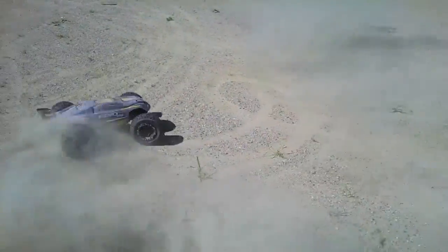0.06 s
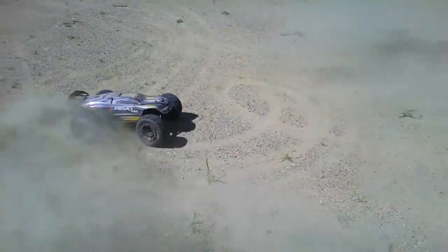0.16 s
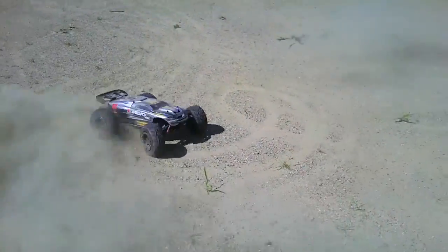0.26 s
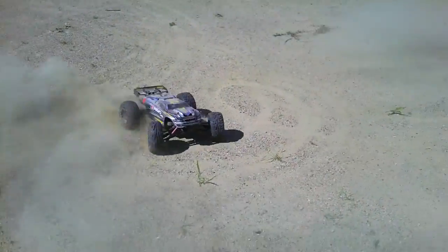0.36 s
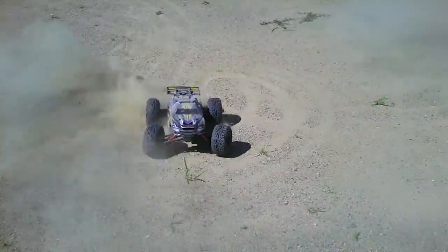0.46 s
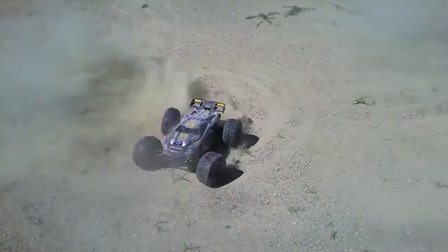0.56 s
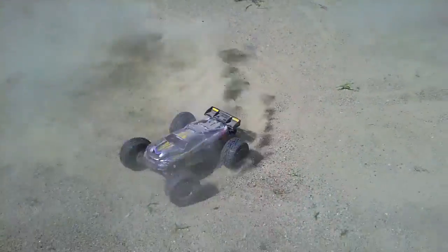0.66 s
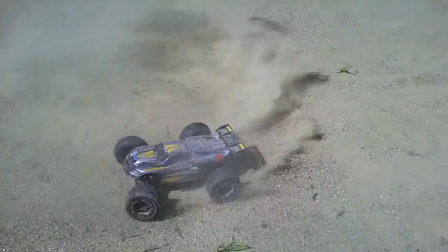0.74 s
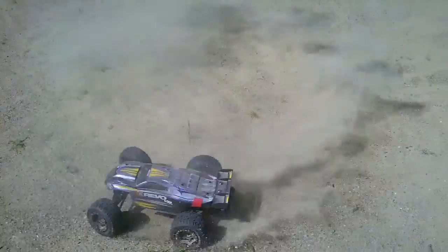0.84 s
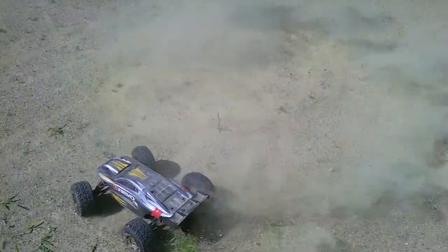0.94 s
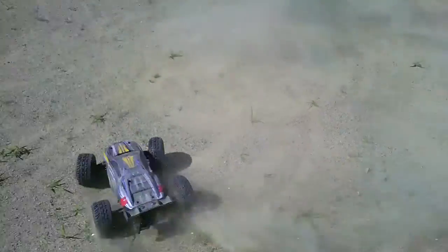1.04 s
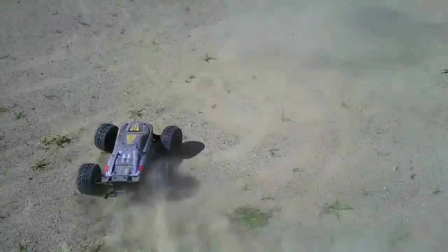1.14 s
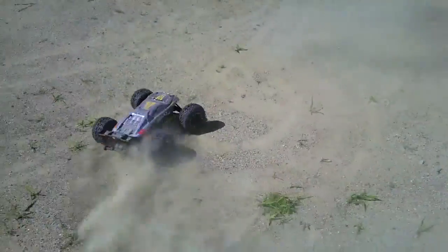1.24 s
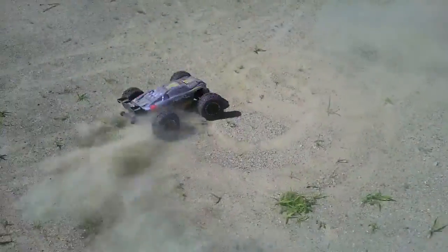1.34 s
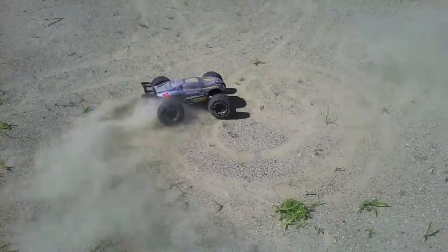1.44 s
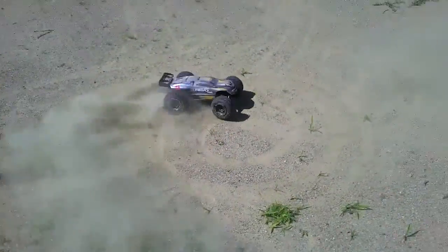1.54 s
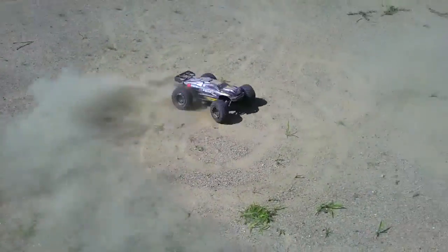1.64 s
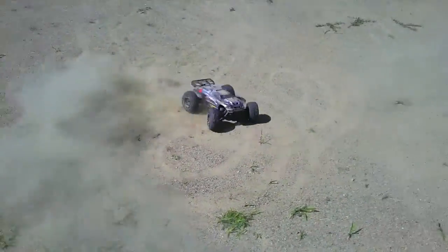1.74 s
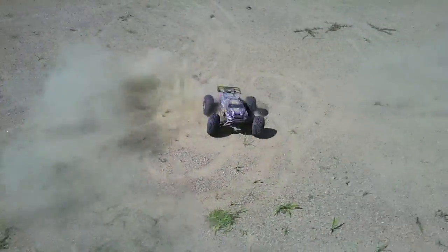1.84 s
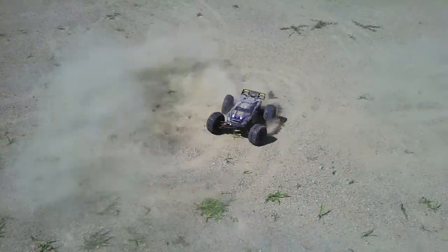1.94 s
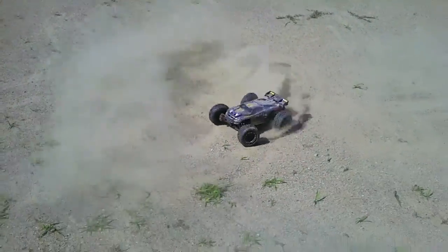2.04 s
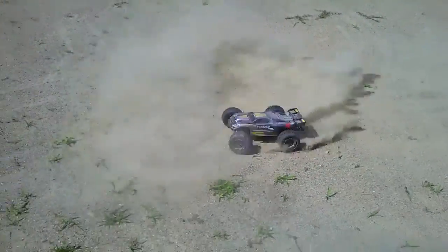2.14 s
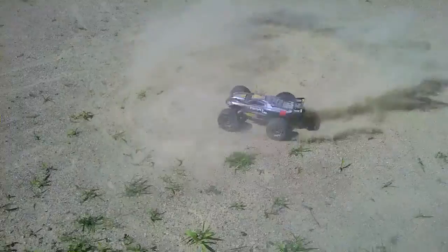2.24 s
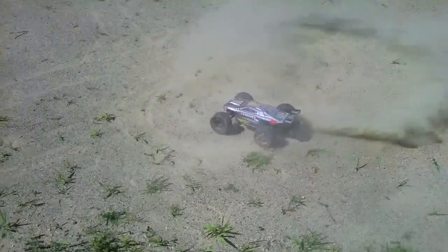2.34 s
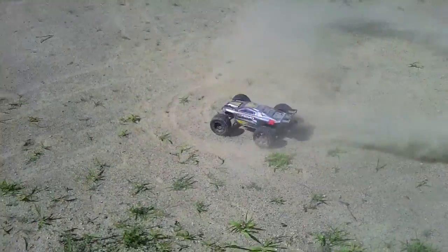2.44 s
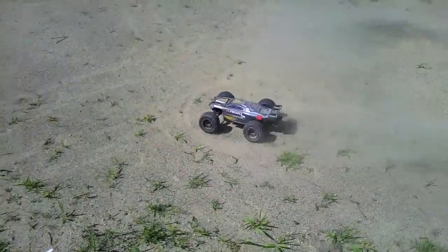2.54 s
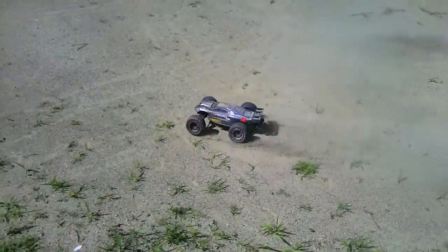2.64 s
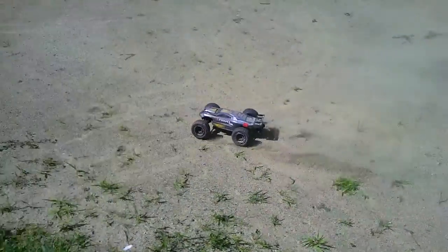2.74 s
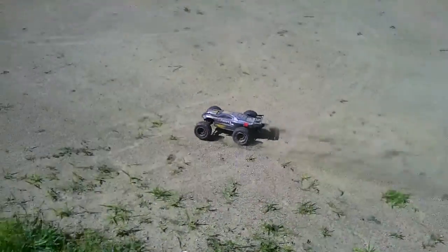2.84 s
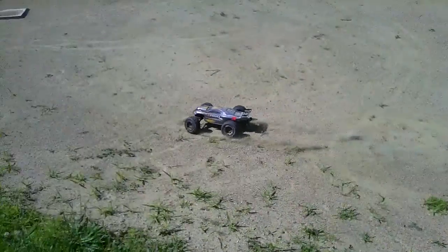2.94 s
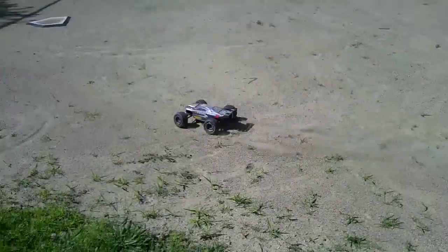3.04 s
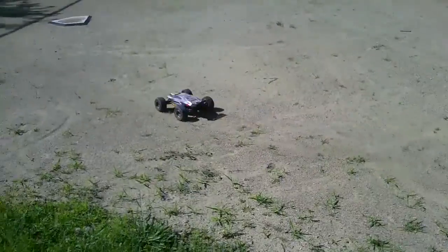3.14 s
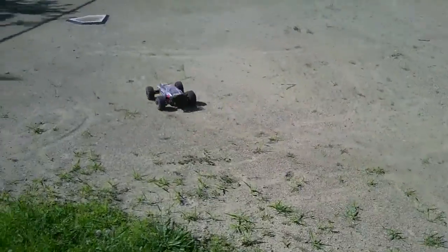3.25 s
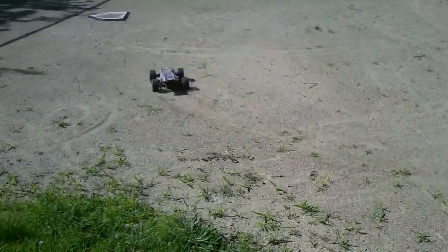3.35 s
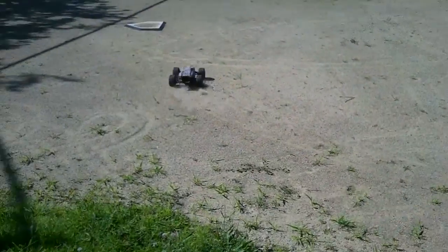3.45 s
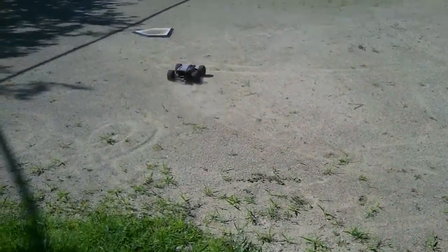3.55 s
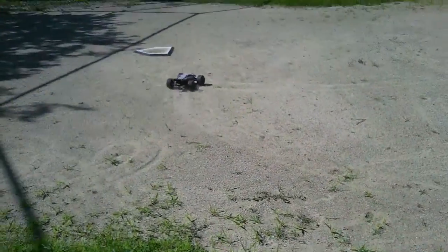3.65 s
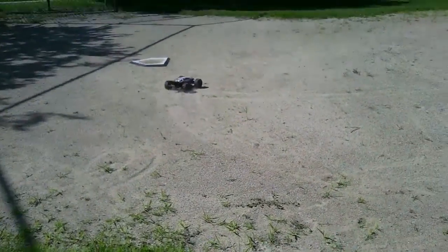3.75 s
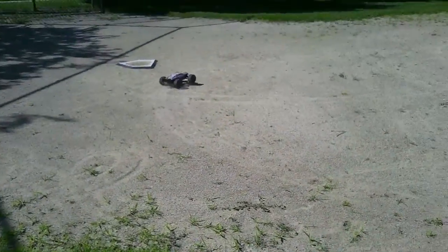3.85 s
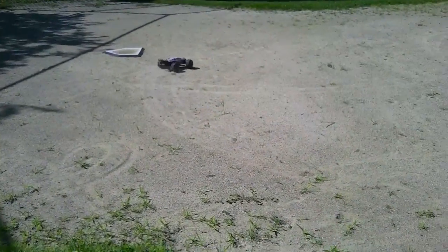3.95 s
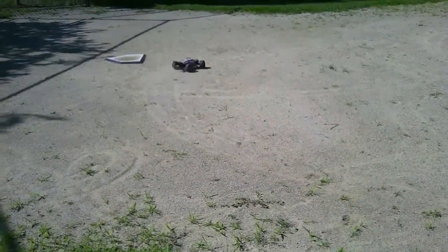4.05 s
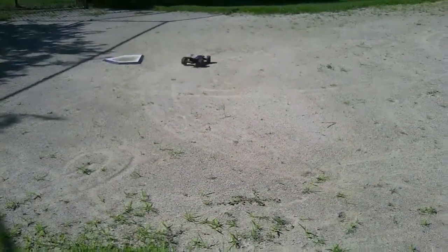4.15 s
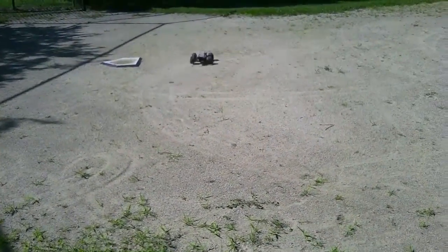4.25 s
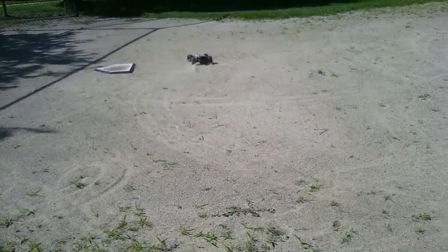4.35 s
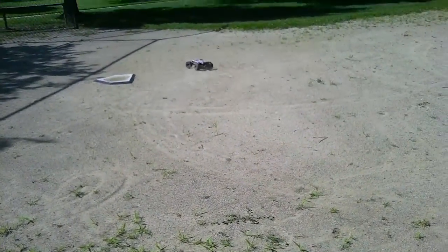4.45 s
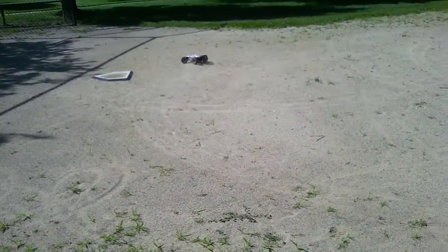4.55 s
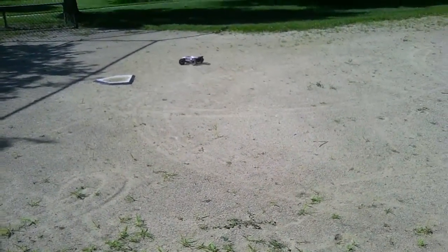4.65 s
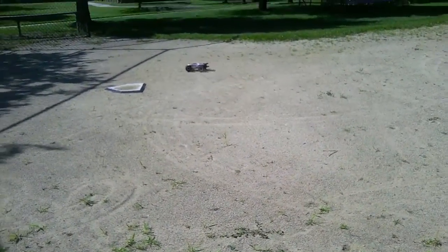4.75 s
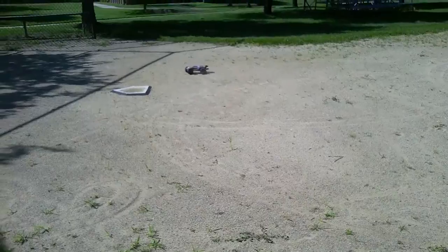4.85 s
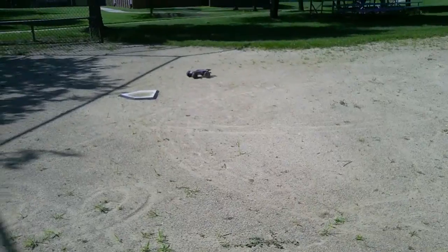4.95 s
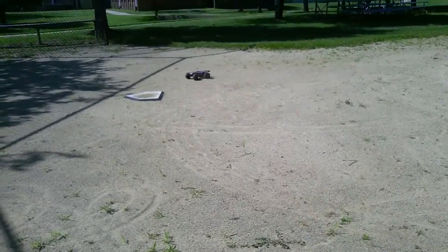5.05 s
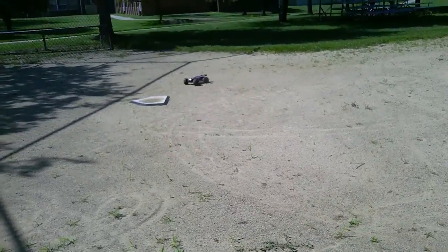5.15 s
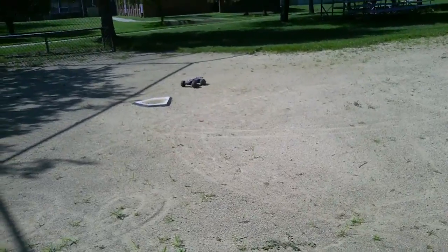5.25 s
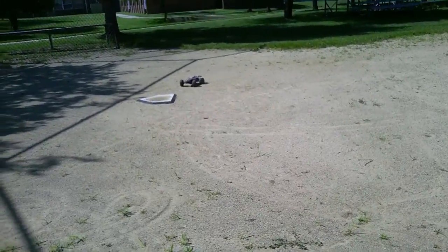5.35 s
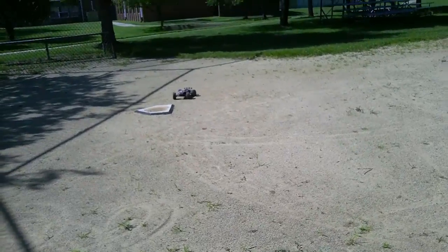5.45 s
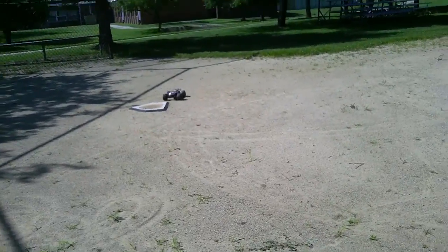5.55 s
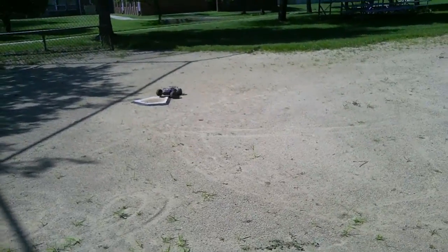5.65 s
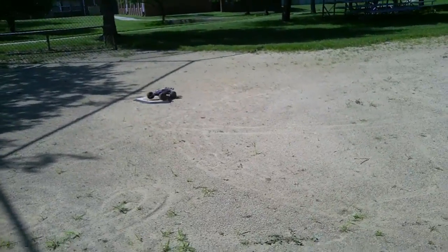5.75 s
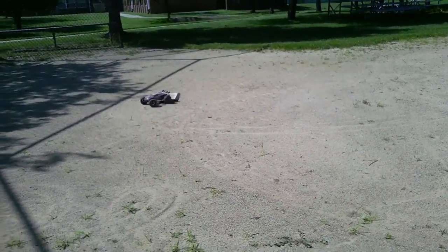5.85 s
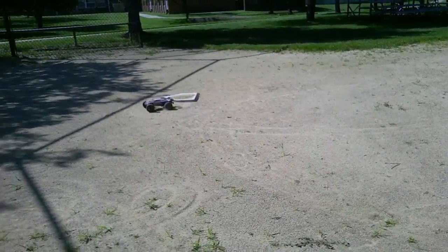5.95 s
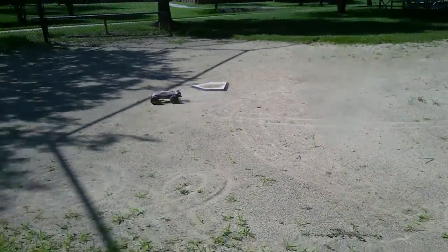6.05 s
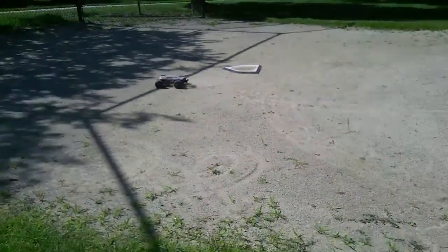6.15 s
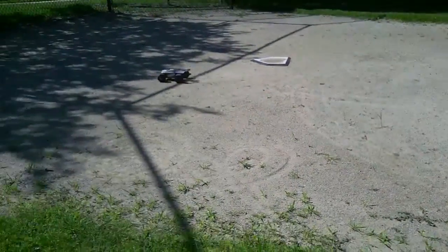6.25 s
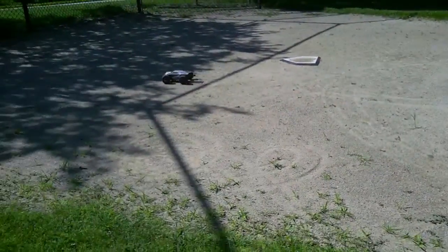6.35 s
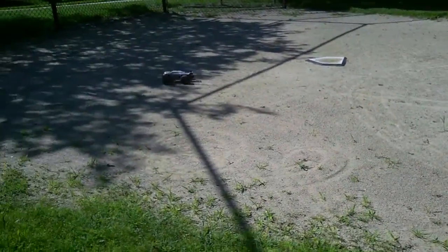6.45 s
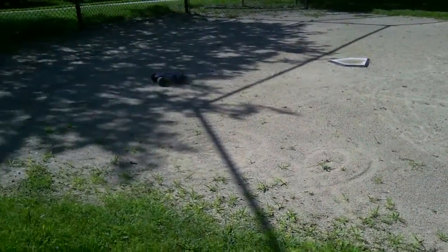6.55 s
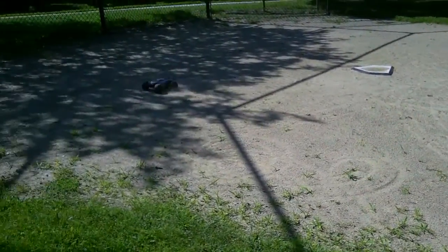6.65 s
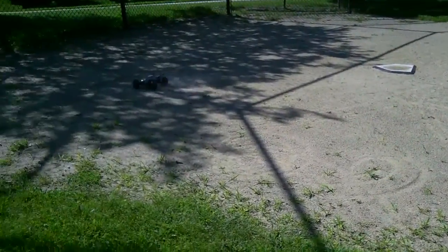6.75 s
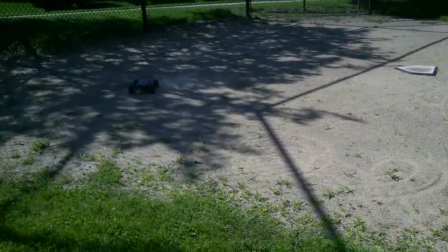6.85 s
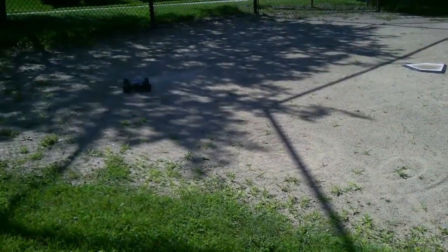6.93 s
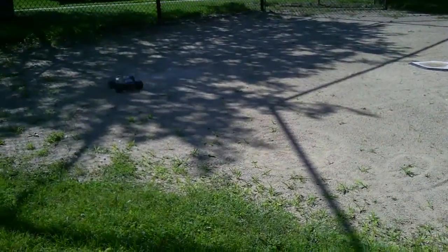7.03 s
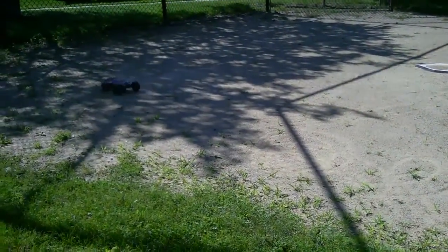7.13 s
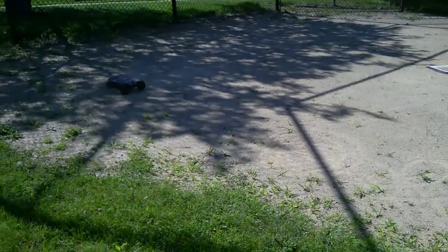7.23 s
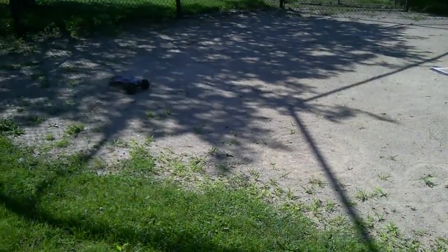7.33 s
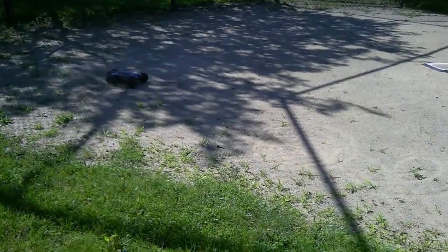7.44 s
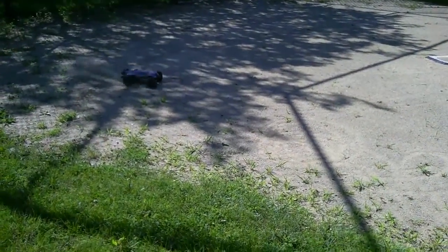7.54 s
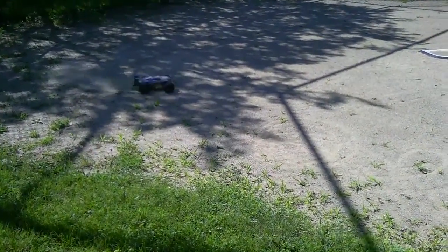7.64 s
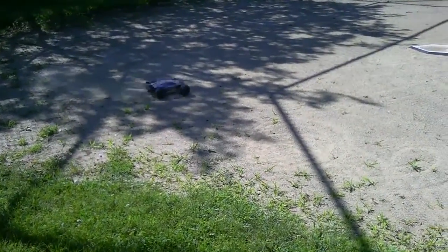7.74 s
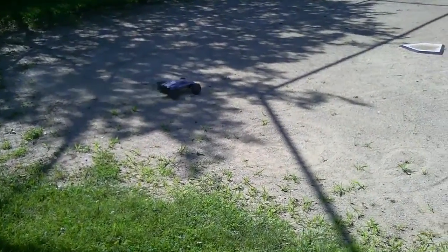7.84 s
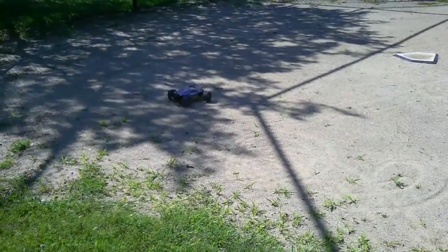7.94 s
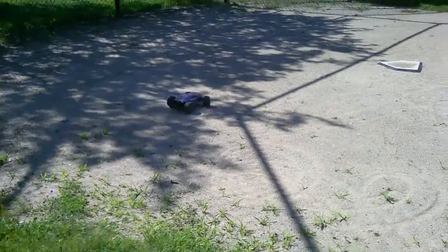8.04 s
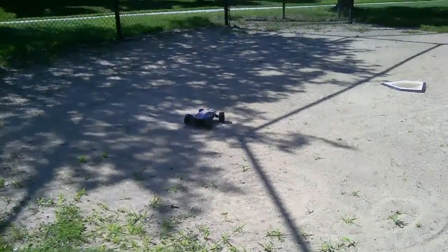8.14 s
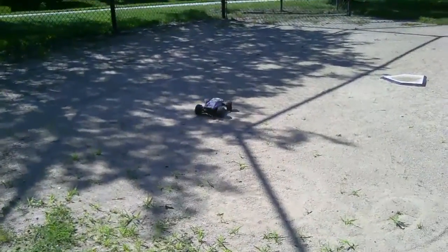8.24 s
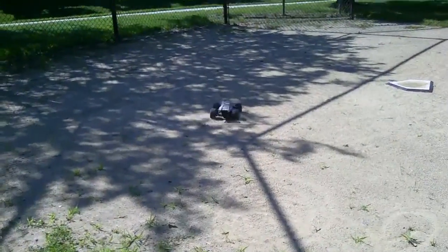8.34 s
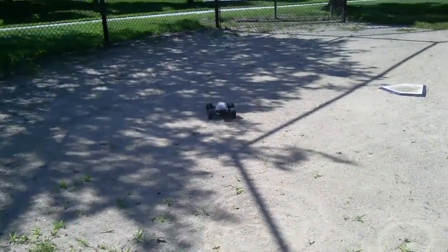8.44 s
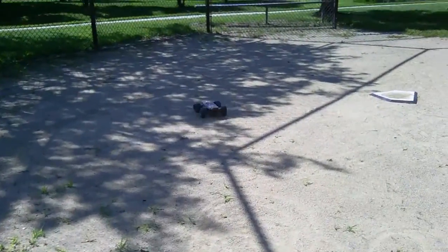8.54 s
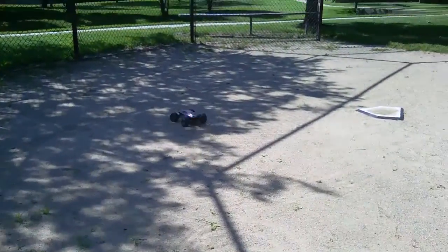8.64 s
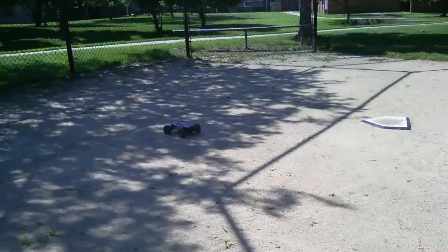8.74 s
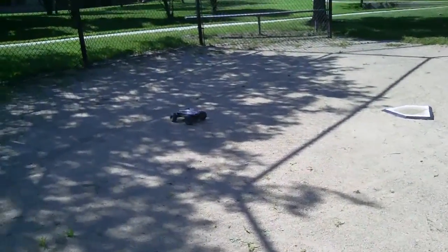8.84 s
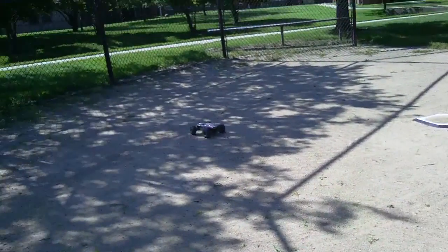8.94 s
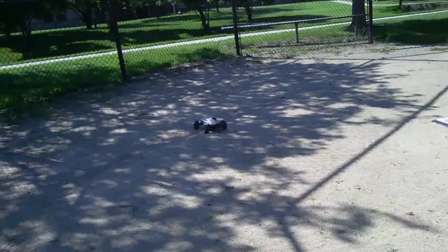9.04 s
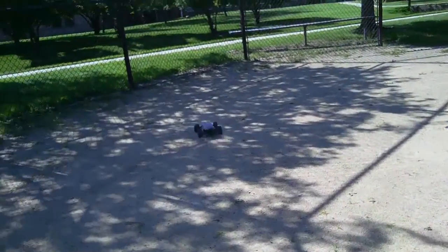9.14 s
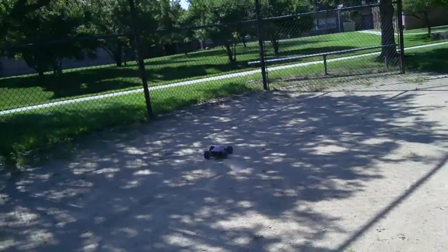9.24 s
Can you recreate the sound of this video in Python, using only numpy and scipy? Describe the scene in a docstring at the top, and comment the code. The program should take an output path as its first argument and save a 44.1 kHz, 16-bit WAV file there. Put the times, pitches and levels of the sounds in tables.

```python
"""A small electric radio-controlled truck spins doughnuts on a dirt ballfield, then drives off in throttle bursts.
Its gears are tones at multiples of a tooth rate, bent by every wheel turn and coloured by the housing.
Tyres are three bands of grainy noise; the speed controller sings a fixed pitch at part throttle.
Squeals glide, stones crack, the chassis knocks, and a breeze touches the single microphone."""
import sys
import numpy as np
from scipy import signal
from scipy.fft import rfft, irfft, next_fast_len
from scipy.io import wavfile
from scipy.ndimage import uniform_filter1d, minimum_filter1d, map_coordinates

SR = 44100
rng = np.random.default_rng(int(sys.argv[2]) if len(sys.argv) > 2 else 0)


def dump(signal):
    """Clip the signal to [-1, 1] and save it as 16-bit WAV at the path in sys.argv[1]."""
    limited = np.clip(np.atleast_2d(signal).T, -1, 1)
    pcm = np.round(limited * 32767).astype(np.int16)
    wavfile.write(sys.argv[1], SR, pcm)


N = 409688
TIME = np.arange(N) / SR
RELEASE_DB_PER_S = 115  # how fast dirt noise and whine die after a burst
SPIN_END_S, SPIN_STOP_DB_PER_S = 2.15, 196  # throttle off; how fast the doughnut dies

# drivetrain tones, strongest under full power: [multiple of tooth rate, level/dB against crunch, roughness]
# roughness runs 0-1 and is clipped there
STRAIN_TONES = [(.432, -11, 0.42), (0.851, -22.5, 0.06), (1.239, -10.5, 1.1), (1.46, -16.5, 1.1),
                (2.77, -6, 0.65)]
# overtones that follow the octave: [multiple of tooth rate, relative level/dB, roughness]
OVERTONES = [(1.459, -10, .4), (2, -0.5, 0.04), (3.002, -8, 0.3), (3.999, -4, 0.86)]
SPIN_STRAIN_DB, DRIVE_STRAIN_DB = 0, -13  # strain tones in the doughnuts and when driving


def gears(tooth_hz, wheel, crunch_db):
    """The drivetrain whines; its pitch bends and its tones chatter as the wheels grip and slip."""
    slip = 0.0268 * np.sin(wheel) + 0.012 * wobble(70)
    # below full speed the tyres bite and let go, which jerks the motor harder
    snatch = np.clip((2450 - tooth_hz) / 300, 0, 1) * 0.036 * wobble(85)
    phase = angle(tooth_hz * (1 + slip + snatch))

    tone_db, octave_db = whine_levels()
    tone_gain = amp(tone_db - 1.0 + 2.74 * wobble(60))
    tone = tone_gain * mesh_tone(phase, rough=0.3, width_hz=260)
    overtones = sum(amp(db) * mesh_tone(k * phase, rough, width_hz=300 * k)
                    for k, db, rough in OVERTONES)
    whine = tone + amp(octave_db - 3.3 + 2.9 * wobble(70)) * overtones

    # full power brings out the slower and faster gear stages too
    power_db = np.maximum(SPIN_STRAIN_DB - SPIN_STOP_DB_PER_S * since(SPIN_END_S), DRIVE_STRAIN_DB)
    strain = sum(amp(db + 1.5 * wobble(29.6)) * mesh_tone(k * phase, rough, width_hz=110 + 200 * k)
                 for k, db, rough in STRAIN_TONES)
    return filtered(whine + amp(crunch_db + power_db) * strain, housing)


# gears in the doughnuts at full throttle: [t/s, tooth rate f/Hz]
SPIN_SPEED = [(0, 2372), (.25, 2368), (.54, 2433), (.63, 2567), (.88, 2543), (1.02, 2625), (1.3, 2480),
              (1.88, 2514), (2.13, 2585)]
# throttle bursts, also played by whine_levels and dirt_levels:
# [full throttle t/s, rise t/s, hold t/s, top tooth rate f/Hz, acceleration Hz/s,
#  spray level/dB, crunch level/dB, tread level/dB, tooth tone relative level/dB, octave relative level/dB]
BURSTS = [(2.289, 0.15, .06, 2403, 3010, -49, -34, -35.5, -46, -54),
          (2.655, 0.21, .245, 2540, 6014, -26, -29.5, -31.5, -42, -35),
          (3.28, .22, 0.056, 2064, 3997, -32, -35.5, -36.5, -53, -37.5),
          (3.789, 0.093, 0.061, 1697, 3000, -36.5, -40, -40.5, -49, -43.5),
          (4.235, .16, 0.08, 2002, 4520, -37, -38.5, -41.5, -55, -45),
          (4.973, 0.072, 0.075, 2167, 2480, -43.5, -48.5, -46, -56, -49),
          (5.41, 0.16, 0.096, 2105, 3000, -44.5, -46, -49.5, -56, -68),
          (5.77, 0.36, 0.031, 2167, 2590, -38, -40, -59, -52, -47),
          (5.926, 0.2, .09, 2143, 5520, -41, -38.5, -39, -50.5, -40),
          (6.348, 0.078, .1, 1744, 3000, -51, -42, -44.5, -51, -44.5),
          (6.549, .2, .14, 2197, 3500, -37.5, -41, -43, -50, -43),
          (7.369, 0.41, .12, 2230, 2376, -35.5, -38.5, -39.5, -51.5, -42.5),
          (8.03, 0.24, 0.13, 2160, 2610, -44.5, -43.5, -54, -50, -52),
          (8.528, .1, 0.099, 2130, 3005, -41, -44, -45.5, -54, -66),
          (9.078, 0.21, 0.082, 2082, 2500, -35.5, -38.5, -39.5, -57, -48)]
COAST_HZ_PER_S, CRAWL_HZ = 4400, 1305  # slowing off the throttle; slowest tooth rate


def motor_speed():
    """Tooth rate: each burst pulls the motor up to its top speed, then it coasts down."""
    hz = curves(SPIN_SPEED)[0] - COAST_HZ_PER_S * since(SPIN_END_S)
    for s, _, hold, top_hz, acceleration, *_ in BURSTS:
        pull_hz = top_hz - acceleration * until(s) - COAST_HZ_PER_S * since(s + hold)
        hz = np.maximum(hz, pull_hz)
    return np.maximum(hz, CRAWL_HZ)


# the whine flares as the circling truck swings its gearbox to the microphone:
# [t/s, half length t/s, tooth tone relative level/dB, octave relative level/dB]
FLARES = [(0.016, 0.051, -50, -27), (.2, .1, -36, -38), (0.43, 0.18, -38, -22), (0.682, 0.087, -24, -38),
          (.77, .05, -42, -29), (0.874, 0.083, -26.5, -34), (1.0, 0.052, -42, -21.5),
          (1.083, 0.046, -27.5, -40), (1.37, .09, -39, -28), (1.615, 0.065, -32, -30),
          (1.836, .1, -41, -21), (1.983, 0.061, -51, -27), (2.11, 0.082, -34, -39),
          (2.76, 0.16, -44, -30.5)]
FLARE_DB = 7.5  # drop at a half length from the crest of a flare
SPIN_TONE_DB, SPIN_OCTAVE_DB = -46, -33.5  # steady whine in the doughnuts, relative levels
WHINE_RISE_DB, WHINE_SAG_DB_PER_S = 30, 28  # the gears sing while they pull and ease off at speed


def whine_levels():
    """Tooth tone and octave in relative dB: steady doughnut whine, flares, and a swell for every burst."""
    stop = SPIN_STOP_DB_PER_S * since(SPIN_END_S)
    tone, octave = [SPIN_TONE_DB - stop], [SPIN_OCTAVE_DB - stop]
    for s, half, tone_db, octave_db in FLARES:
        flare = -FLARE_DB * ((TIME - s) / half) ** 2
        tone.append(tone_db + flare)
        octave.append(octave_db + flare)
    for s, rise, hold, *_, tone_db, octave_db in BURSTS:
        approach = -WHINE_RISE_DB * (until(s) / rise) ** 3
        fade = -WHINE_SAG_DB_PER_S * since(s) - RELEASE_DB_PER_S * since(s + hold)
        tone.append(tone_db + approach + fade)
        octave.append(octave_db + approach + fade)
    return together(tone), together(octave)


# gearbox and body resonances: [centre f/Hz, width f/Hz, relative level/dB]
HOUSING = [(1120, 180, -6), (1720, 170, 10), (2113, 210, 9), (2580, 280, -3), (3020, 480, -14),
           (3730, 360, 3.5), (4460, 220, -1), (4700, 740, -2.5), (6500, 1300, 4.5), (8950, 970, 3)]


def housing(hz):
    """Tones swell as they glide through the resonances of the gearbox."""
    resonances = sum(amp(db - 4.0) / (1 + (2 * (hz - centre) / width) ** 2)
                     for centre, width, db in HOUSING)
    return amp(-5.0) + resonances


def mesh_tone(phase, rough, width_hz):
    """A gear tone; dirty, uneven teeth smear a share of it into a narrow band."""
    rough = np.clip(rough, 0, 1)
    smear = wobble(width_hz) * np.sin(phase) + wobble(width_hz) * np.cos(phase)
    return np.sqrt(2 * (1 - rough)) * np.sin(phase) + np.sqrt(rough) * smear


# brief gear squeals: [t/s, length t/s, start f/Hz, end f/Hz, relative level/dB]
SQUEALS = [(0.205, 0.12, 9700, 8800, -30), (1.038, 0.14, 3830, 3395, -24.5),
           (2.43, 0.0501, 4780, 5210, -38), (2.468, .07, 8220, 8700, -40), (2.57, .09, 8360, 8740, -37),
           (2.579, 0.067, 3050, 3300, -46), (2.66, .23, 3665, 3720, -41), (3.058, 0.076, 5700, 5230, -39),
           (4.089, 0.062, 8900, 8700, -47), (5.091, 0.052, 4700, 5180, -52),
           (5.175, 0.0396, 3400, 4090, -51), (5.431, 0.038, 8560, 8000, -43),
           (5.477, 0.053, 8600, 8100, -44), (6.228, 0.05, 5150, 5250, -47), (6.315, .05, 6300, 6400, -45),
           (7.008, 0.061, 7930, 8200, -43), (7.068, .05, 2045, 2200, -43), (7.13, 0.084, 6200, 6500, -46),
           (7.506, 0.047, 3580, 3480, -44), (7.565, .1, 3250, 2550, -45), (8.708, 0.0484, 3100, 3050, -48),
           (8.788, .06, 2880, 2950, -52), (8.863, 0.046, 5550, 5200, -45.5), (8.89, 0.079, 2050, 2220, -45),
           (8.953, .07, 5650, 7040, -47)]


def squeals():
    """Brief rough gear tones glide in pitch while they swell and fade."""
    level, pitch = np.zeros(N), np.zeros(N)
    for s, length, start_hz, end_hz, db in SQUEALS:
        u = np.linspace(0, 1, max(int(length * SR), 8))
        add(level, s, amp(db + 2.5) * np.sin(np.pi * u))
        pitch[round(s * SR):][:len(u)] = start_hz + (end_hz - start_hz) * u
    phase = angle(pitch * (1 + 0.01175 * wobble(80)))
    return level * mesh_tone(phase, rough=1.0, width_hz=500)


# speed controller at part throttle: [start t/s, end t/s, level/dB before the tone levels]
CHOPPING = [(5.186, 5.32, -64), (7.695, 8.202, -61.5), (8.205, 8.542, -58), (8.682, 8.908, -63)]
# its switching tone: [multiple of the switching rate, relative level/dB]
SWITCHING = [(1, 2), (2, 5.5), (3, 4), (4, -4)]


def controller():
    """At part throttle the chopped motor current sings at a fixed pitch."""
    ramp_s, switching_hz = 0.013, 3035
    level = sum(amp(db) * np.clip(np.minimum(TIME - start, end - TIME) / ramp_s, 0, 1)
                for start, end, db in CHOPPING)
    phase = 2 * np.pi * switching_hz * TIME
    return level * sum(amp(db) * mesh_tone(k * phase, rough=0.7, width_hz=130) for k, db in SWITCHING)


# colour of lugs drumming, gravel crushing and sand flying: each [f/Hz, relative level/dB per Hz]
TREAD = [(100, -40), (220, -16.5), (330, -4.5), (470, 2), (620, -3.5), (790, -1), (950, -5.5), (1200, -5),
         (1500, -10), (2500, -25)]
CRUNCH = [(700, -22.5), (1250, -4), (1700, -1.5), (2150, 1.5), (2350, 0.5), (2600, 1.5), (3100, 1),
          (3700, 2.5), (4300, 3.5), (5000, 1), (5800, -9.5), (8000, -15.5)]
SPRAY = [(3500, -33.5), (5000, -0.5), (5800, -2), (6900, 0), (8000, 1), (9000, 2), (10300, 0.5),
         (12000, -2.5), (14000, -7), (15500, -13.5), (17000, -37)]


def tyres(wheel, tread_db, crunch_db, spray_db):
    """Lugs drum on the ground, crush gravel and throw sand in spurts."""
    spurt_db = 0.54 * wobble(55) + 0.5 * wobble(28) + 0.69 * np.sin(wheel)
    tread = patchy(coloured(grit(900, spread_db=3, share=0.28), TREAD), depth_db=1.13)
    crunch = patchy(coloured(grit(2500, spread_db=3.5, share=0.4), CRUNCH), depth_db=1.75)
    spray = patchy(coloured(grit(3000, spread_db=2.5, share=0.4), SPRAY), depth_db=1.66)
    rolling = amp(tread_db + spurt_db) * tread + amp(crunch_db + spurt_db) * crunch
    return rolling + amp(spray_db + spurt_db + 1.06 * wobble(260)) * spray


# dirt thrown by the wheels in the doughnuts: [t/s, tread level/dB, spray level/dB]
SPIN_DIRT = [(0, -31, -19), (.48, -31.5, -17), (.72, -24.5, -14.8), (1.06, -27.5, -15.5),
             (1.17, -30, -16.5), (1.5, -33, -21), (1.8, -37, -20), (1.97, -36.5, -20), (2.17, -32.5, -21)]
# tyre noise rolling between bursts, by distance and ground: [t/s, level/dB before the layer offsets]
ROLL = [(2.1, -46), (2.24, -33), (2.42, -35), (3.05, -44.5), (3.5, -39), (4.03, -50), (4.45, -40),
        (4.75, -47.5), (4.95, -47.5), (5.13, -58), (5.7, -50), (6.08, -41), (6.25, -45), (6.82, -39.5),
        (7.0, -46), (7.57, -38), (7.8, -45), (8.45, -44), (8.8, -55.5), (9.29, -41.5)]
ROLL_TREAD_DB, ROLL_CRUNCH_DB, ROLL_SPRAY_DB = -1, -3.5, 0  # the three dirt layers against it
SKID_S, SPIN_CRUNCH_DB = 0.05, -5.5  # the tyres slide on a moment; crunch against spray
RISE_DB = 9.5  # climb of the dirt noise over a burst's rise time
TREAD_LAG_S = 0.013  # the rumble follows as the truck gathers speed


def dirt_levels():
    """Tread, crunch and spray in dB: doughnuts, plain rolling, and a swell for every burst."""
    spin_tread, spin_spray = curves(SPIN_DIRT) - SPIN_STOP_DB_PER_S * since(SPIN_END_S + SKID_S)
    roll = curves(ROLL)[0]
    tread = [spin_tread, roll + ROLL_TREAD_DB]
    crunch = [spin_spray + SPIN_CRUNCH_DB, roll + ROLL_CRUNCH_DB]
    spray = [spin_spray, roll + ROLL_SPRAY_DB]
    for s, rise, hold, _, _, spray_db, crunch_db, tread_db, _, _ in BURSTS:
        def swell(at):
            return -RISE_DB * until(at) / rise - RELEASE_DB_PER_S * since(at + hold)
        spray.append(spray_db + swell(s))
        crunch.append(crunch_db + swell(s))
        tread.append(tread_db + swell(s + TREAD_LAG_S))
    return together(tread), together(crunch), together(spray)


def grit(rate, spread_db, share):
    """Single grain impacts of very uneven size, rate a second, over the rush of countless fine ones."""
    hits = (rng.random(N) < rate / SR) * rng.choice([-1, 1], N)
    sizes = amp(spread_db * np.minimum(rng.exponential(size=N), 5))
    # share is the power of the single impacts, 0-1
    return np.sqrt(share) * unit(hits * sizes) + np.sqrt(1 - share) * rng.standard_normal(N)


def patchy(x, depth_db):
    """The colour of the dirt noise shifts as the truck turns and meets new ground."""
    z = signal.stft(x, nperseg=512)[2]
    field = uniform_filter1d(rng.standard_normal(z.shape), size=5, axis=0)  # smooth over frequency
    field = uniform_filter1d(field, size=7, axis=1)  # and over time
    return unit(signal.istft(z * amp(depth_db * unit(field)), nperseg=512)[1][:N])


# flung stones: [t/s, relative peak level/dB]
STONES = [(.697, -3.5), (1.0298, -3), (1.096, -0.5), (1.1403, -0.5), (1.273, -7), (1.605, -15), (1.921, -9),
          (2.07, -14), (2.133, -15), (2.346, -19), (2.421, -28), (2.59, -27), (3.636, -24), (4.371, -21),
          (4.453, -23), (5.399, -27), (6.029, -21), (7.613, -30), (7.647, -15.5), (7.68, -21), (9.169, -31)]


def stones():
    """Pebbles crack brightly against the shell: short high-passed noise bursts."""
    out, t = np.zeros(N), np.arange(SR // 25) / SR
    for s, db in STONES:
        # each one scrapes in over a couple of milliseconds and dies at once
        crack = rng.standard_normal(len(t)) * amp(-60 * t / 0.01) * (1 - np.exp(-t / 0.0023)) ** 2
        add(out, s - 0.001, amp(db + 6.0) * crack / np.abs(crack).max())
    return filtered(out, lambda hz: hz ** 2 / (hz ** 2 + 6000 ** 2))


# chassis bottoming on bumps: [t/s, peak level/dB]
BUMPS = [(.922, -27), (2.168, -16.5), (2.276, -17.5), (3.879, -24), (5.243, -29.5), (5.4, -23.5),
         (5.439, -19), (8.636, -24.5), (8.712, -28)]
# plastic chassis modes, each strike varied: [nominal f/Hz, nominal relative level/dB, 60 dB decay t/s]
CHASSIS = [(408, -8, 0.033), (700, -7, 0.05), (826, -6.5, 0.031), (897, -4, 0.032), (1290, -11, 0.018),
           (1660, -7, .03)]


def bumps():
    """The suspension bottoms out and the chassis gives a hollow knock of decaying modes and noise."""
    out, t = np.zeros(N), np.arange(SR // 8) / SR
    for s, db in BUMPS:
        knock = 0.45 * rng.standard_normal(len(t)) * amp(-60 * t / 0.02)
        for hz, level, t60 in CHASSIS:
            decay = amp(level + rng.normal(0, 3.9) - 60 * t / t60)
            knock += decay * np.sin(2 * np.pi * hz * rng.normal(1, 0.078) * t)
        knock *= 1 - np.exp(-t / 0.0015)
        add(out, s, amp(db) * knock / np.abs(knock).max())
    return out


# colour of breeze on the microphone and of open ground: each [f/Hz, relative level/dB per Hz]
GUST = [(20, -22), (50, -11), (90, 4), (130, -3.5), (190, -2), (280, -8), (600, -41)]
PARK = [(40, -46), (100, -10.5), (180, 3), (240, -5), (285, 7), (340, -7), (600, -15), (1200, -6.5),
        (3000, -14.5), (12000, -64)]
# puffs of breeze on the microphone: [t/s, half length t/s, crest level/dB before the flutter]
PUFFS = [(.08, 0.08, -47), (3.126, 0.048, -34.5), (3.2, .14, -47), (3.715, .09, -48), (4.435, 0.087, -39),
         (4.697, 0.097, -39.5), (4.979, 0.098, -51), (5.468, .06, -44), (5.963, 0.088, -45),
         (6.25, .07, -53)]
PUFF_DB, CALM_DB = 11, -63.5  # drop at a half length from a crest; air between puffs, before flutter


def air():
    """Puffs of breeze on the microphone over the low murmur of open ground."""
    puffs_db = [db - PUFF_DB * np.abs(TIME - s) / half for s, half, db in PUFFS]
    breeze_db = together([CALM_DB] + puffs_db)
    flutter_db = 4.1 * wobble(22)
    breeze = amp(breeze_db + flutter_db) * coloured(rng.standard_normal(N), GUST)
    return breeze + amp(-48.5) * coloured(rng.standard_normal(N), PARK)


def amp(db):
    """Decibels to gain."""
    return 10 ** (np.asarray(db) / 20)


def unit(x):
    """Scale to rms 1."""
    return x / np.sqrt(np.mean(x ** 2) + 1e-20)


def curves(rows):
    """One value per sample for each column after the time."""
    s, *cols = np.transpose(rows)
    return [np.interp(TIME, s, c) for c in cols]


def wobble(rate):
    """A smooth random curve of rms 1, rate knots a second."""
    knots = rng.standard_normal(int(N * rate / SR) + 4)
    return unit(map_coordinates(knots, [TIME * rate]))


def filtered(x, response):
    """x times a response of frequency."""
    size = next_fast_len(N + 8192)
    return irfft(rfft(x, size) * response(np.fft.rfftfreq(size, 1 / SR)), size)[:N]


def coloured(x, spectrum):
    """x shaped by (Hz, dB) points, at rms 1."""
    f, db = np.transpose(spectrum)
    return unit(filtered(x, lambda hz: amp(np.interp(np.log(hz + 1), np.log(f), db))))


def add(track, s, sound):
    """Mix a sound into the track at s seconds."""
    part = track[max(round(s * SR), 0):][:len(sound)]
    part += sound[:len(part)]


def angle(hz):
    """Phase of something turning at a changing rate."""
    return 2 * np.pi * np.cumsum(hz) / SR


def together(levels_db):
    """Level in dB of several sounds at once, summed as power."""
    return 10 * np.log10(sum(10 ** (np.maximum(db, -120) / 10) for db in levels_db))


def since(s):
    """Seconds after s, zero before it."""
    return np.maximum(TIME - s, 0)


def until(s):
    """Seconds left to s, zero after it."""
    return np.maximum(s - TIME, 0)


def scene():
    """The throttle drives motor speed and dirt noise; each wheel turn sways both whine and spray."""
    tooth_hz = motor_speed()
    tread_db, crunch_db, spray_db = dirt_levels()
    wheel = angle(tooth_hz / 110 * (1 + 0.2 * wobble(12)))  # 110 teeth pass per wheel turn
    truck = gears(tooth_hz, wheel, crunch_db) + squeals() + controller()
    ground = tyres(wheel, tread_db, crunch_db, spray_db) + stones() + bumps()
    return np.tile(truck + ground + air(), (2, 1))


TOP_HZ = 15480  # nothing passes above this


def record(dry):
    """One microphone on both channels: a narrow notch, a limiter that ducks after peaks, a band limit."""
    x = filtered(dry[0], lambda hz: 1 - 0.93 / (1 + ((hz - 7860) / 90) ** 2))
    needed = np.minimum(1, 0.97 / (np.abs(x) + 1e-9))
    # the gain drops just ahead of a peak and is held for some 20 ms
    held = minimum_filter1d(needed, size=1001, origin=400)
    limited = x * uniform_filter1d(held, size=101)
    return np.tile(filtered(limited, lambda hz: hz < TOP_HZ), (2, 1))


dry = scene()
out = record(dry)
dump(out)
```